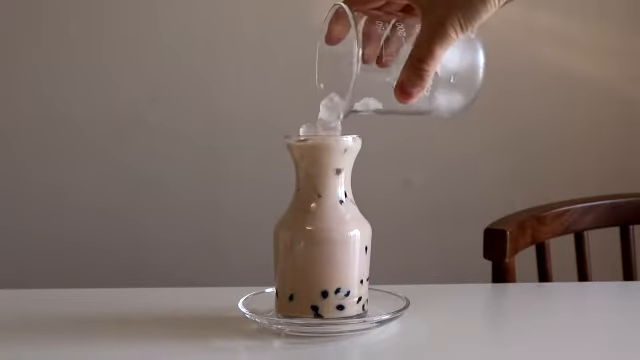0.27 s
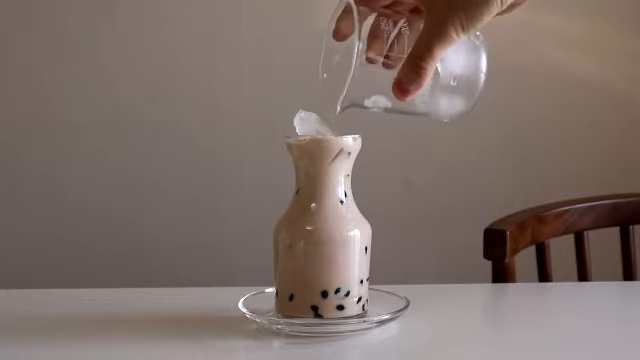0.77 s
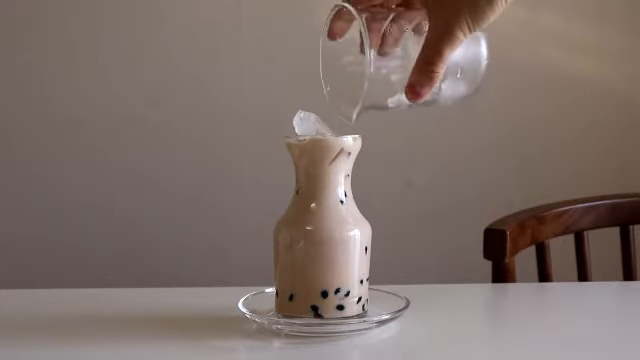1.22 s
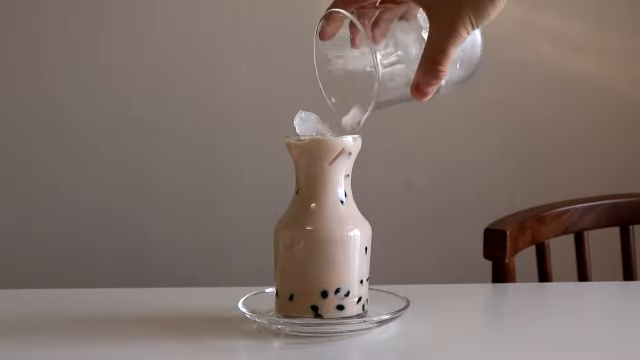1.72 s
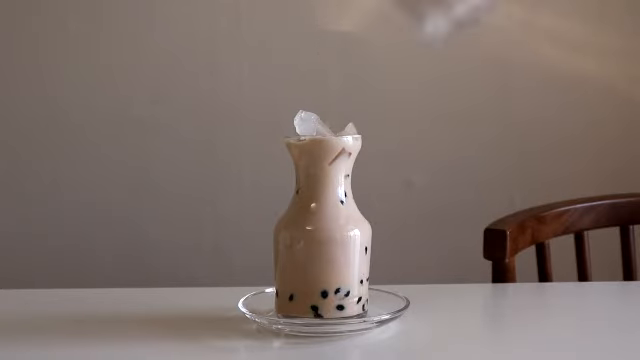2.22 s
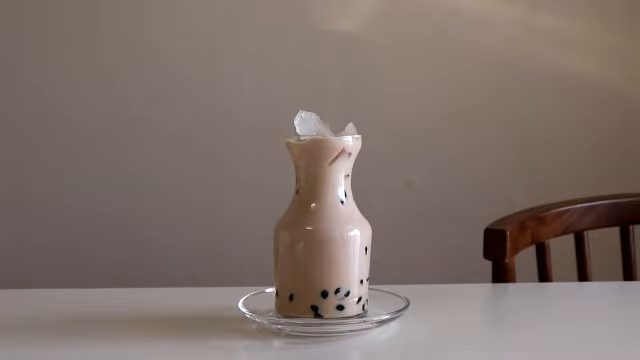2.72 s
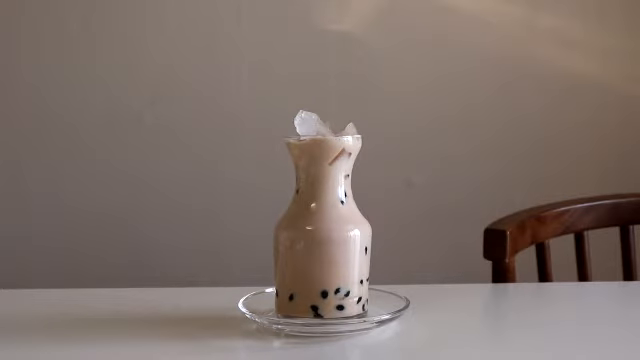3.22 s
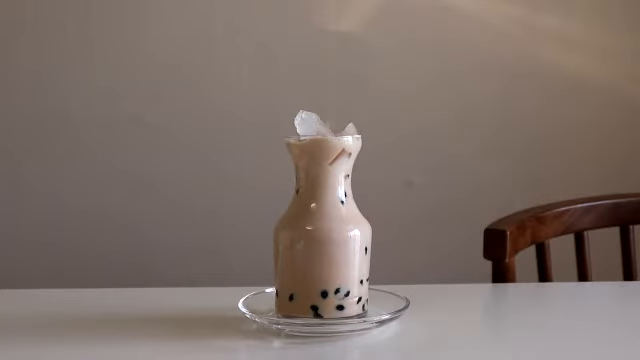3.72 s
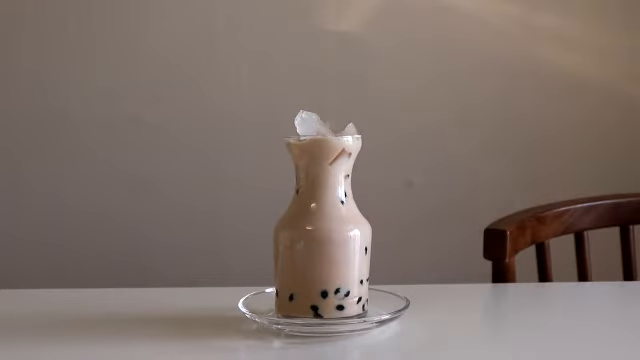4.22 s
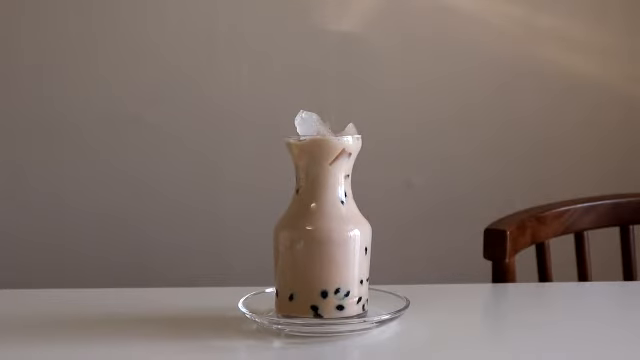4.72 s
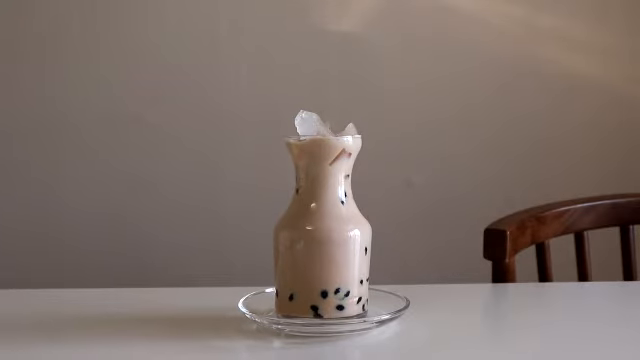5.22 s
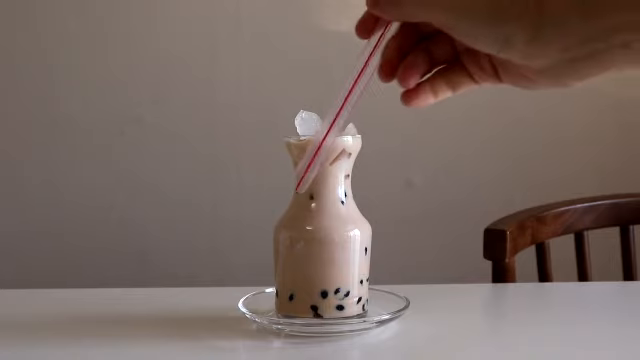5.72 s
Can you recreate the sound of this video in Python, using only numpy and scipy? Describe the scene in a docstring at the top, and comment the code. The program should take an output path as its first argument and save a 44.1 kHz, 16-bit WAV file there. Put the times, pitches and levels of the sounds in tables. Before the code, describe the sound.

In a quiet small room, ice cubes clack lightly into a full glass carafe, followed by one loud cracking knock on its rim and a gritty slide with landing cubes. The empty jug clinks brightly and thumps onto the table. A straw rattles, rustles under fingers and taps hollowly into the drink. Close stereo microphones, faint low room noise.

```python
"""Ice cubes knock together as a small glass jug tips them into a full carafe on a table, in a quiet room.
The jug knocks the carafe, the last cube slides out and lands; the jug clinks and is set down.
A straw is picked up with a rustle and poked between the cubes. Two spaced microphones listen.
Impacts are short noisy forces ringing damped modes; slides are swells of coloured, uneven noise;
the background is filtered diffuse noise and a faint sine hum."""
import sys
import numpy as np
from scipy import signal
from scipy.fft import rfft, irfft, next_fast_len
from scipy.io import wavfile
from scipy.ndimage import uniform_filter1d

SR = 44100
rng = np.random.default_rng(int(sys.argv[2]) if len(sys.argv) > 2 else 0)


def to_wav(sig):
    """Store sig (one row per channel, or 1-D mono) as 16-bit WAV at the path in sys.argv[1].

    Samples outside -1..1 are clipped; the rate is SR.
    """
    pcm = np.clip(np.atleast_2d(sig), -1, 1) * 32767
    pcm = np.round(pcm).astype(np.int16)
    wavfile.write(sys.argv[1], SR, pcm.T)  # frames by channels


N = 263277
TIME = np.arange(N) / SR  # s
SIZE = 32768  # samples in one event with its reverberation
HZ = np.fft.rfftfreq(SIZE, 1 / SR)
STROKE_S = 0.05  # stroke length at which the colour is unshifted


def amp(db):
    """Level definition: a level in decibels as an amplitude ratio."""
    return 10 ** (np.asarray(db) / 20)


def unit(x):
    """Normalisation: scale to an rms value of 1."""
    return x / np.sqrt(np.mean(x ** 2) + 1e-20)


def along(points, hz):
    """Logarithmic frequency scale: interpolate (frequency, value) points along it."""
    f, value = np.transpose(points)
    return np.interp(np.log(hz + 1), np.log(f + 1), value)


def filtered(x, response):
    """Linear filtering: multiply the spectrum of x by a response of frequency."""
    n = x.shape[-1]
    padded = next_fast_len(n + 8192)
    spectrum = rfft(x, padded) * response(np.fft.rfftfreq(padded, 1 / SR))
    return irfft(spectrum, padded)[..., :n]


def resonances(modes, hz):
    """Modal superposition: damped resonators of alternating sign add up to a causal response."""
    total = 0
    for k, (centre, width, db) in enumerate(modes):
        mode = 1j * hz * width / (centre * centre - hz * hz + 1j * hz * width)
        total = total + (-1) ** k * amp(db) * mode
    return total


def band(hz, centre_hz, octaves):
    """Band-pass colour: a smooth hump on a logarithmic frequency axis."""
    distance = np.log2((hz + 1) / centre_hz) / octaves
    return 1 / (1 + (distance / 2) ** 2) ** 3


def add(track, sound, s):
    """Superposition: mix a stereo sound in from time s."""
    start = max(round(s * SR), 0)
    track[:, start:start + sound.shape[1]] += sound[:, :N - start]


def direction(pan_db, lag_ms):
    """Interaural-type cues: channel 0 is delayed; shading between channels grows for shorter waves."""
    shade_db = pan_db * np.sqrt(HZ / 4000)
    delay = np.exp(-2j * np.pi * HZ * lag_ms / 1000)
    return np.array([amp(shade_db / 2) * delay, amp(-shade_db / 2)])


def diffuse(size, spacing=0.15):
    """Diffuse-field coherence: two microphones (spacing in m) hear alike only at long waves."""
    def shares(hz):
        alike = 0.97 * np.sinc(2 * hz * spacing / 343)  # speed of sound 343 m/s
        return np.sqrt([(1 + alike) / 2, (1 - alike) / 2])
    mid, side = filtered(rng.standard_normal((2, size)), shares)
    return np.array([mid + side, mid - side])


# Reverberation time of the room: f/Hz, T60/s
ROOM_T60 = [(100, 0.79), (260, 0.28), (700, 0.25), (2000, 0.27), (5000, 0.26), (13000, 0.22)]


def room(first_wall=0.0006, hold=0.011, diffuse_from_hz=260):
    """Reverberant decay: dense reflections hold (s), then die band by band; long waves scatter little."""
    hz, t, bins = signal.stft(diffuse(SIZE), SR, nperseg=256)
    decay_db = -60 * np.maximum(t - hold, 0) / along(ROOM_T60, hz)[:, None]
    tail = signal.istft(bins * amp(decay_db), SR, nperseg=256)[1][:, :SIZE]
    tail = filtered(tail, lambda hz: hz ** 2 / np.hypot(hz ** 2, diffuse_from_hz ** 2))
    tail = tail * (1 - np.exp(-(TIME[:SIZE] / first_wall) ** 2))  # reflections build up after the direct sound
    return rfft(unit(tail)) / np.sqrt(SIZE)


def strikes(hits, modes, level_db, room_db, pan_db, lag_ms, room_pan_db, grit, grit_time):
    """Impact excitation: a sharp push plus a crunch (grit_time in s) rings the modes; the room answers."""
    track = np.zeros((2, N))
    lead = 256  # samples kept ahead of the contact
    for s, db, bright_db in hits:
        crunch = rng.standard_normal(SIZE) * np.exp(-TIME[:SIZE] / grit_time)
        crunch = unit(crunch) / np.sqrt(SIZE)
        tilt_db = bright_db * np.log2((HZ + 200) / 2500)
        force = (1 + grit * rfft(crunch)) * amp(level_db + db + tilt_db)
        paths = direction(pan_db, lag_ms) + amp(room_db) * room() * direction(room_pan_db, 0)
        sound = irfft(force * resonances(modes, HZ) * paths)
        add(track, np.roll(sound, lead, axis=1), s - lead / SR)
    return track


def strokes(rows, colour, rise_share, speed_shift, pan_db, lag_ms, room_db=1, room_pan_db=-1.5, grain_db=4):
    """Friction noise: a swell of tiny uneven slips; with a positive shift, quicker strokes sound higher."""
    track = np.zeros((2, N))
    lead = 0.25  # s before the peak
    t = TIME[:SIZE] - lead
    for s, db, length in rows:
        unevenness = unit(uniform_filter1d(rng.standard_normal(SIZE), size=60))
        slips = rng.standard_normal(SIZE) * amp(grain_db * unevenness)
        stretch = (length / STROKE_S) ** speed_shift
        side_share = np.where(t < 0, rise_share, 1 - rise_share)
        swell = np.exp(-(t / length / side_share) ** 2 / 2)
        stroke = unit(filtered(slips, lambda hz: colour(hz * stretch))) * swell
        paths = direction(pan_db, lag_ms) + amp(room_db) * room() * direction(room_pan_db, 0)
        add(track, irfft(rfft(stroke) * paths) * amp(db) / np.sqrt(2), s - lead)
    return track


# Cubes struck by ice: t/s, relative level/dB, brightness/(dB per octave)
CUBE_HITS = [(.109, -28, 8), (.228, -5.5, -2), (.571, 1, -1.5), (.584, -4, -3.5), (.6145, 2.5, -2.5),
             (.814, -16.5, 1), (1.8152, 11, 0), (1.837, 11.5, 1), (1.8428, 6.5, 0.5)]
# Modes of the ice cubes: f/Hz, width/Hz, relative level/dB
CUBE_MODES = [(268, 110, -0.5), (790, 180, -6), (1550, 93, -1), (1960, 300, -3.5), (3060, 460, 0.5),
              (3860, 360, -2), (4490, 380, -0.5), (6400, 960, -7.5), (7650, 1600, -9.5), (13500, 2700, -34)]


def cubes_landing():
    """Modal damping: broad, quickly damped modes make ice dropping on ice sound short and hard."""
    return strikes(CUBE_HITS, CUBE_MODES, level_db=-6.5, room_db=-2.5, pan_db=-2.0, lag_ms=0.022,
                   room_pan_db=0.5, grit=1.0, grit_time=0.001)


# Knocks on the carafe: t/s, relative level/dB, brightness/(dB per octave)
CARAFE_KNOCKS = [(0.6096, 7, -0), (.616, 4, .5), (1.4484, 26.5, 0.07), (1.8175, 1.5, 0.6)]
# Modes of the full carafe: f/Hz, width/Hz, relative level/dB
CARAFE_MODES = [(80, 54, -13), (152.3, 7.8, 5.5), (209.7, 13, 10), (290, 32, 0.5), (382, 60, 1.5),
                (638, 120, 1.5), (778, 46, 2), (1054, 580, -14.5), (1360, 65, 1), (1520, 210, -9),
                (1910, 50, -3.5), (2116, 44, -1.5), (2430, 105, -7), (2666, 130, -2.5), (2870, 70, -2.5),
                (3020, 60, -2), (3190, 60, -4), (3480, 120, -9.5), (3770, 86, -9), (5840, 620, -21),
                (7560, 330, -17.5), (8500, 440, -20.5), (13300, 2900, -34)]


def carafe_knocked():
    """Impact response: knocks ring the low and middle modes of the full carafe."""
    return strikes(CARAFE_KNOCKS, CARAFE_MODES, level_db=-2.5, room_db=0.5, pan_db=-2.0, lag_ms=0.021,
                   room_pan_db=-2.0, grit=0.24, grit_time=0.0036)


# Modes of the carafe's rim: f/Hz, width/Hz, relative level/dB
RIM_MODES = [(2530, 150, -4), (4370, 430, -5), (6370, 440, -2.5), (8460, 410, -5.5), (11500, 450, -14),
             (13800, 600, -9)]


def rim_cracking(growth=1.4, bright_db=-2.5):
    """Nonlinear contact: the rim's crack grows by more than 1 dB for each dB of knock."""
    hardest = max(db for _, db, _ in CARAFE_KNOCKS)
    cracks = [(s, growth * (db - hardest), bright_db) for s, db, _ in CARAFE_KNOCKS]
    return strikes(cracks, RIM_MODES, level_db=21.0, room_db=-7, pan_db=-3.0, lag_ms=0.0082,
                   room_pan_db=2.5, grit=0.95, grit_time=0.0025)


# Ice skipping along the jug: t/s, relative level/dB, brightness/(dB per octave)
JUG_SLIPS = [(1.752, -5, -2), (1.769, 7.5, 0.64), (1.7842, 10.5, -0.16), (2.616, -19, 1.2)]
# Modes of the jug with ice in it: f/Hz, width/Hz, relative level/dB
ICED_JUG_MODES = [(1500, 230, -14.5), (3640, 380, -10), (6340, 270, -1), (8400, 360, -1.5),
                  (9540, 300, -15), (11100, 1300, -23), (14700, 720, -26.5)]


def ice_skipping():
    """Intermittent contact: ice skipping along the jug drives its modes with gritty little impacts."""
    return strikes(JUG_SLIPS, ICED_JUG_MODES, level_db=-3.5, room_db=-7, pan_db=-0.5, lag_ms=0.011,
                   room_pan_db=-1.0, grit=1.75, grit_time=0.0037)


def pouring():
    """Superposition: skipping ice, landing cubes, knocks on the carafe and its cracking rim."""
    return cubes_landing() + carafe_knocked() + rim_cracking() + ice_skipping()


# Ice skidding down the jug's wall: t/s of the peak, relative level/dB, length/s
ICE_ON_GLASS = [(1.762, -41.5, 0.029)]
# Ice scraping over ice: t/s of the peak, relative level/dB, length/s
ICE_ON_ICE = [(.585, -52, 0.058), (1.831, -35.5, 0.038)]


def ice_sliding():
    """Sliding friction: a cube skids down the jug's resonant wall; cubes scrape over other cubes."""
    def wall(hz):
        return resonances(ICED_JUG_MODES, hz) * band(hz, centre_hz=3700, octaves=0.75)

    def ice(hz):
        return band(hz, centre_hz=3160, octaves=0.85)

    on_glass = strokes(ICE_ON_GLASS, wall, rise_share=0.5, speed_shift=0, pan_db=-4, lag_ms=0.02)
    on_ice = strokes(ICE_ON_ICE, ice, rise_share=0.81, speed_shift=0.3, pan_db=-4, lag_ms=0.025)
    return on_glass + on_ice


# Clinks of the jug: t/s, relative level/dB, brightness/(dB per octave)
JUG_CLINKS = [(2.8196, 16, -3), (2.867, 11.5, -2), (2.93, -10, -14), (2.998, -4, -11.5)]
# Modes of the empty jug: f/Hz, width/Hz, relative level/dB
JUG_MODES = [(1390, 84, -11.5), (2546, 97, 1), (3030, 130, -6), (3700, 160, -1.5), (4650, 1450, -14),
             (5850, 340, -7), (6440, 130, 0.5), (7230, 210, -6), (7570, 140, -2.5), (8430, 300, -9),
             (9400, 700, -19.5), (12300, 900, -23), (14300, 1000, -26)]
# Jug set down on the table: t/s, relative level/dB, brightness/(dB per octave)
TABLE_HITS = [(3.4104, 24.1, 0)]
# Modes of the table: f/Hz, width/Hz, relative level/dB
TABLE_MODES = [(57.7, 2.5, 9), (164, 15, 4.5), (207, 10, -2), (294, 55, -0.5), (388, 74, -2),
               (530, 205, -4.5), (778, 47, 6), (877, 48, 3), (966, 79, 3.5), (1066, 87, 1), (1200, 130, 1),
               (1450, 130, 1.5), (1820, 450, -8), (2320, 300, -9), (2670, 440, -14), (3750, 560, -16.5),
               (5800, 1900, -24.5), (12200, 5600, -55)]


def jug_put_away():
    """Impact response: to the right the empty jug rings high, then its thump drives the table's modes."""
    clinks = strikes(JUG_CLINKS, JUG_MODES, level_db=-3, room_db=2.5, pan_db=-10.0, lag_ms=0.18,
                     room_pan_db=0.0, grit=0.66, grit_time=0.0049)
    thump = strikes(TABLE_HITS, TABLE_MODES, level_db=-1.5, room_db=3.5, pan_db=-3, lag_ms=0.21,
                    room_pan_db=-3.0, grit=0.23, grit_time=0.002)
    return clinks + thump


# Modes of the straw against the table: f/Hz, width/Hz, relative level/dB
STRAW_ON_TABLE_MODES = [(865, 350, -6), (1350, 190, -3), (1840, 230, -4.5), (2750, 200, -1.5),
                        (3750, 135, -0.5), (4400, 400, -6.5), (6850, 1400, -14)]
# Flicks of the open straw: t/s, relative level/dB, brightness/(dB per octave)
STRAW_FLICKS = [(4.9255, 3.5, 0), (4.957, -2, 0)]
# Air modes of the straw open at both ends: f/Hz, width/Hz, relative level/dB
OPEN_STRAW_MODES = [(1890, 55, 4), (2020, 49, -10)]
# Taps of the straw in the drink: t/s, relative level/dB, brightness/(dB per octave)
STRAW_TAPS = [(5.816, 7, 4), (5.842, -15, 0), (5.936, -3.5, 4), (5.9538, 13, -3)]
# Modes of the straw with one end in the drink: f/Hz, width/Hz, relative level/dB
DIPPED_STRAW_MODES = [(322, 130, -32), (960, 21, -1.5), (1940, 53, -10.5), (2700, 140, -24),
                      (3840, 550, -27.5), (4900, 240, -23), (7650, 1400, -31)]


def straw(count=4, pickup_s=4.065, gap_s=0.007, loss_db=2, bright_db=-2):
    """Air-column resonance: the straw rattles and pops, an octave lower once drink closes one end."""
    rattle = [(pickup_s + k * gap_s, -k * loss_db, bright_db) for k in range(count)]  # each bounce weaker
    pickup = strikes(rattle, STRAW_ON_TABLE_MODES, level_db=-3.0, room_db=1.0, pan_db=-11, lag_ms=0.27,
                     room_pan_db=-5, grit=1.34, grit_time=0.006)
    flicks = strikes(STRAW_FLICKS, OPEN_STRAW_MODES, level_db=3, room_db=-10, pan_db=-8, lag_ms=0.12,
                     room_pan_db=-11, grit=0.37, grit_time=0.0037)
    taps = strikes(STRAW_TAPS, DIPPED_STRAW_MODES, level_db=1.5, room_db=0.0, pan_db=-1, lag_ms=0.024,
                   room_pan_db=-1.0, grit=0.67, grit_time=0.0025)
    return pickup + flicks + taps


# Straw dragged over the table: t/s of the peak, relative level/dB, length/s
STRAW_DRAGS = [(3.98, -44, 0.06), (4.21, -48.5, 0.089)]
# Fingers along the straw: t/s of the peak, relative level/dB, length/s
FINGER_STROKES = [(4.066, -45, 0.025), (4.125, -52, .058), (4.189, -46, 0.019), (4.4, -54, 0.098),
                  (4.724, -51, 0.024), (4.93, -53.5, 0.15), (4.995, -46, 0.01), (5.314, -51, 0.098)]
# Whistling of the straw's air column: t/s of the peak, relative level/dB, length/s
TUBE_WHISTLES = [(4.88, -55, 0.12), (5.0, -50.5, 0.045)]


def straw_handling():
    """Friction noise: dull drags on the table, hissing fingers and a narrow band as the air column whistles."""
    def dull(hz):
        return band(hz, centre_hz=1180, octaves=1.0)

    def hiss(hz):
        return band(hz, centre_hz=5560, octaves=0.8)

    def whistle(hz):
        return band(hz, centre_hz=2030, octaves=0.065)

    drags = strokes(STRAW_DRAGS, dull, rise_share=0.65, speed_shift=0.31, pan_db=-5, lag_ms=0.18)
    fingers = strokes(FINGER_STROKES, hiss, rise_share=0.48, speed_shift=0.077, pan_db=-5.5, lag_ms=0.236)
    whistles = strokes(TUBE_WHISTLES, whistle, rise_share=0.58, speed_shift=0.082, pan_db=-9, lag_ms=0.18)
    return drags + fingers + whistles


# Spectrum of the steady room noise: f/Hz, relative density level/dB
AIR_SPECTRUM = [(15, -43.5), (25, -8), (49, -5), (93, -3), (113, -9), (122, -12), (140, -6.5), (198, -3.5),
                (331, -9), (368, -8), (421, -10.5), (1110, -10), (1530, -13.5), (3260, -18), (15500, -30.5)]
# Low modes of the room: f/Hz, width/Hz, relative level/dB
ROOM_MODES = [(63.2, 5.8, 0.5), (145.2, 16.7, -1.5), (209.2, 17, -1), (278.7, 28, -4), (364, 90, -7.5)]
# Swelling of the room's low drone: t/s, level/dB
DRONE_LEVEL = [(0, -53), (.65, -53.5), (1.3, -57), (1.68, -51.5), (2.05, -56), (2.5, -50), (3.6, -53),
               (4.3, -52.5), (5.1, -55.5)]


def ambience(air_db=-51.5, hum_hz=140, hum_db=-58, hum_on_s=4.24, hum_off_s=6.03, hum_fade_s=0.52):
    """Diffuse field and room modes: steady noise, a swelling low drone, and a late hum that fades in and out."""
    air = unit(filtered(diffuse(N), lambda hz: amp(along(AIR_SPECTRUM, hz))))
    drone = unit(filtered(diffuse(N), lambda hz: resonances(ROOM_MODES, hz)))
    drone_gain = amp(np.interp(TIME, *np.transpose(DRONE_LEVEL)))
    gate = np.clip(np.minimum(TIME - hum_on_s, hum_off_s - TIME) / hum_fade_s, 0, 1)
    hum = np.sqrt(2) * gate * np.sin(2 * np.pi * hum_hz * TIME)
    return amp(air_db) * air + drone_gain * drone + amp(hum_db) * hum


def scene():
    """Superposition: every source adds at the two microphones."""
    return pouring() + ice_sliding() + jug_put_away() + straw() + straw_handling() + ambience()


def record(dry):
    """Soft saturation and band limiting: the highest peaks are rounded, then the top band is removed."""
    rounded = dry / (1 + (dry / 0.88) ** 6) ** (1 / 6)
    return filtered(rounded, lambda hz: hz < 15750)


dry = scene()
out = record(dry)
to_wav(out)
```